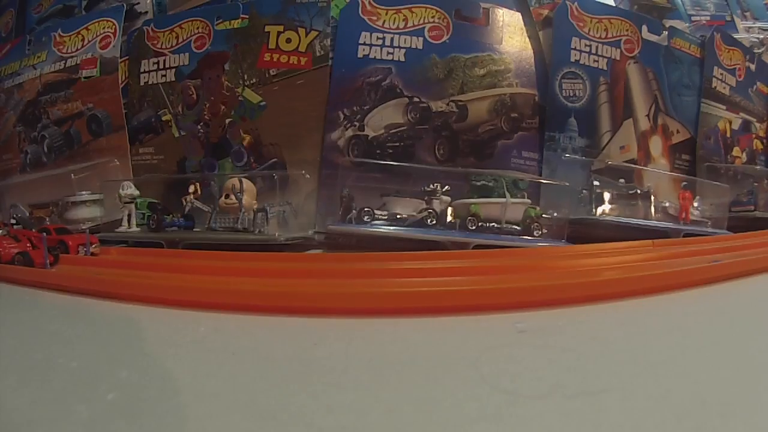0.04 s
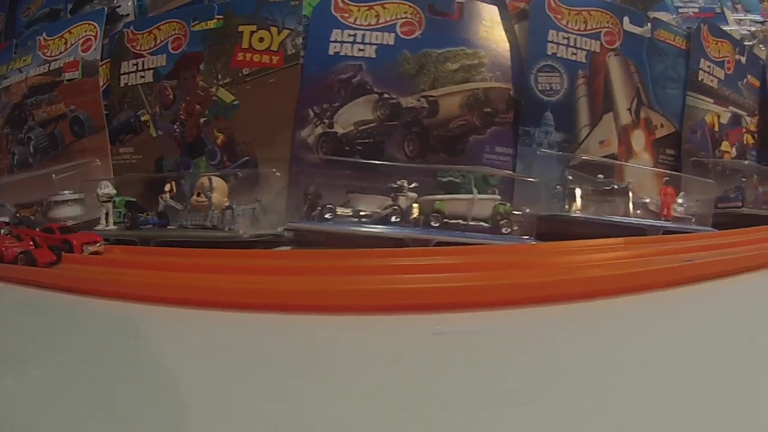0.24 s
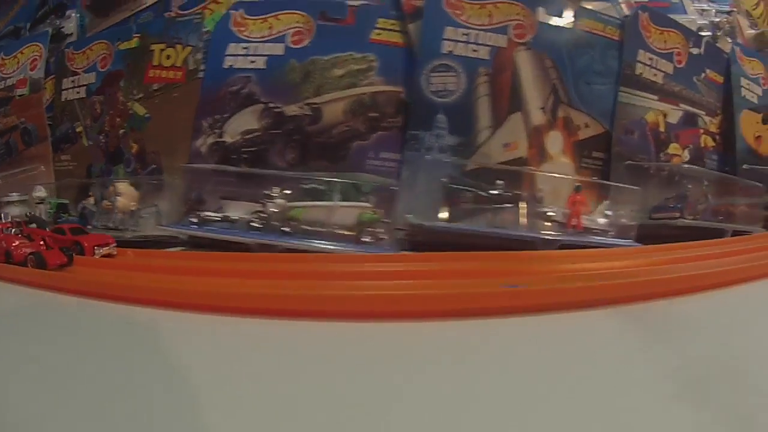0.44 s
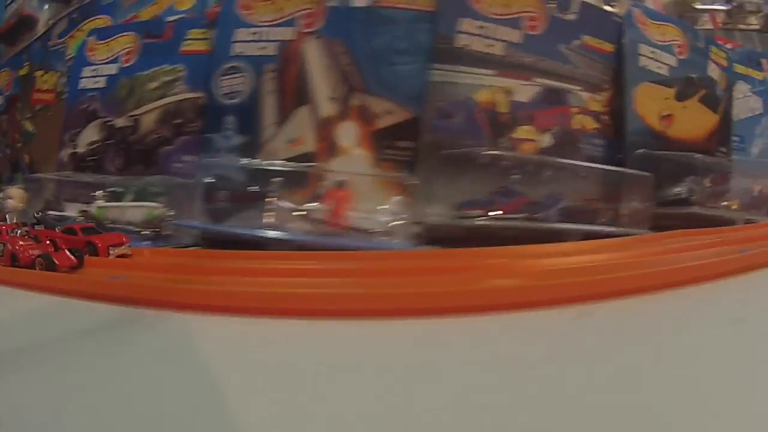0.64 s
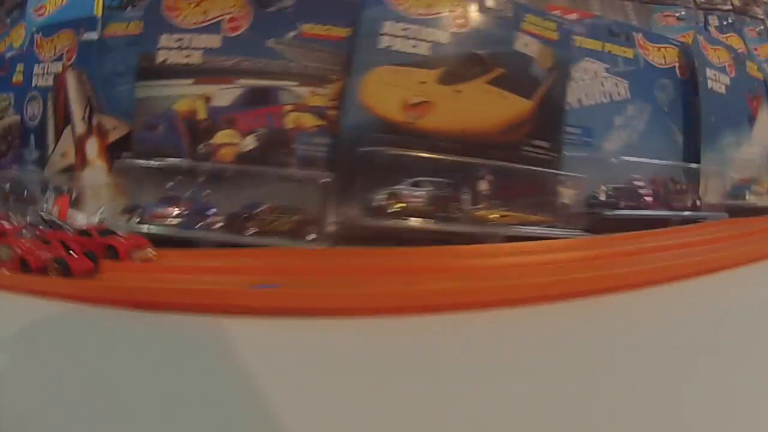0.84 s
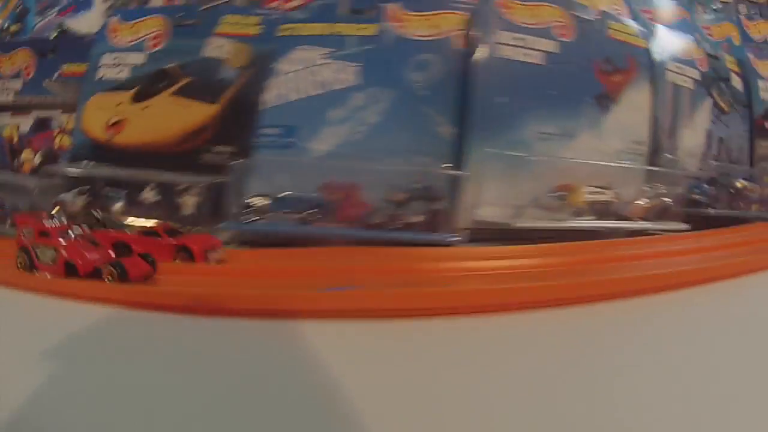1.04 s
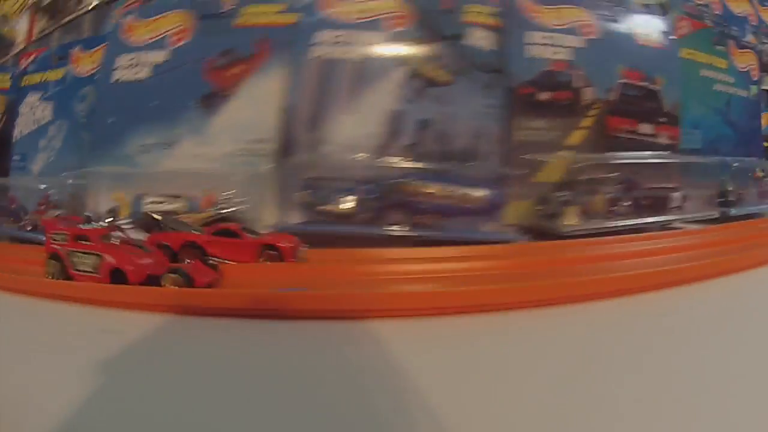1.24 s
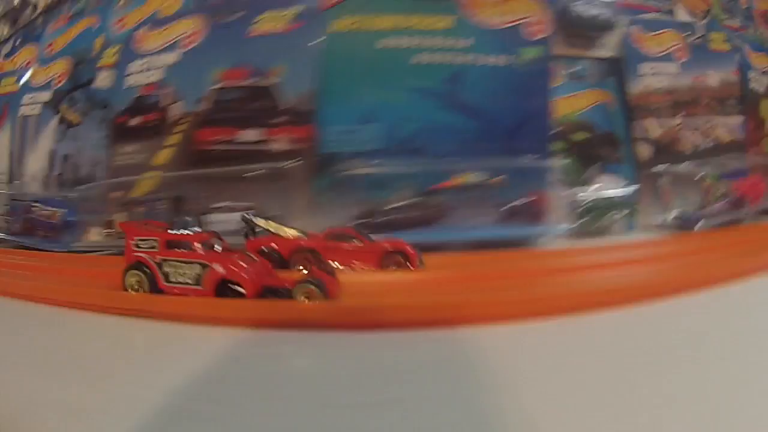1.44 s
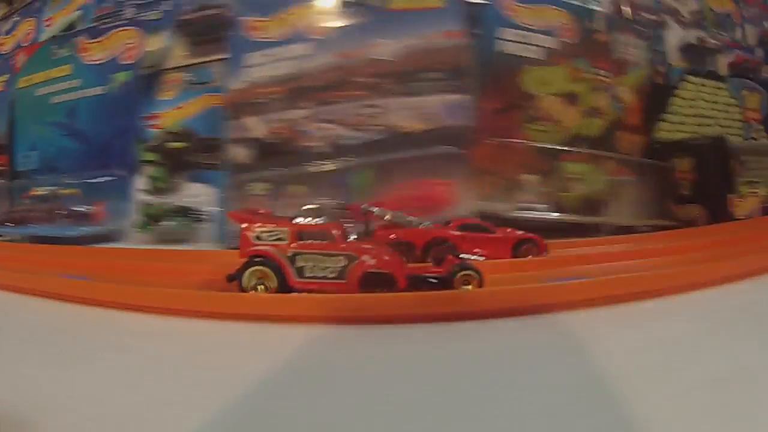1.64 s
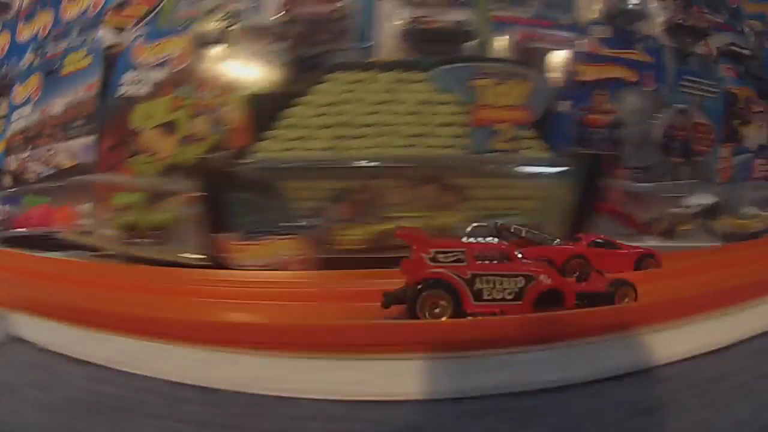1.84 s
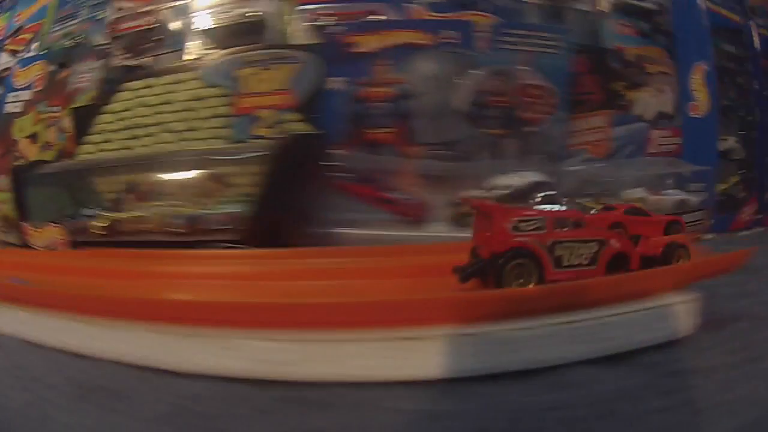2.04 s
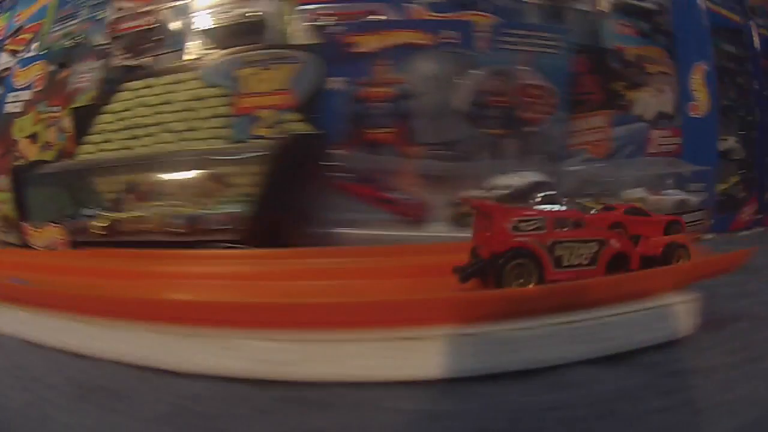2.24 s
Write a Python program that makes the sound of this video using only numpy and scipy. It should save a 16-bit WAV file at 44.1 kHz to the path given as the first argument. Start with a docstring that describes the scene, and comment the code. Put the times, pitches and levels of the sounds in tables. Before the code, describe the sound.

Toy cars roll along a plastic track indoors. After a brief scuff, hard little wheels gather speed, clacking and rattling over a hollow rumble with a few knocks, then the sound stops abruptly. The microphone rides alongside.

```python
"""Toy cars on a plastic track

Indoors, close up, with the microphone riding on a car beside them. A short scuff starts the run.
Hard little wheels roar and clack on the plastic, the carriage rumbles and rocks, and the hollow
under the track drones. Loose axles rattle and bumps in the track knock. The sound stops abruptly."""
import sys
import numpy as np
from scipy import signal
from scipy.fft import rfft, irfft, next_fast_len
from scipy.io import wavfile
from scipy.ndimage import map_coordinates

SR = 44100
rng = np.random.default_rng(int(sys.argv[2]) if len(sys.argv) > 2 else 0)


def generate_wav(sig):
    """Save sig (samples, or channels by samples) to the path in sys.argv[1] as 16-bit PCM at SR."""
    pcm = np.round(np.clip(np.atleast_2d(sig).T, -1, 1) * 32767).astype(np.int16)
    wavfile.write(sys.argv[1], SR, pcm)


N = 101429

# Loudness along the run. Each row: time in seconds, relative level in dB.
ROCKING_LEVELS = [(0.09, -67), (0.132, -26), (0.206, -28.5), (0.234, -25.5), (0.346, -24), (0.576, -20),
                  (0.656, -19), (0.678, -25), (0.918, -18), (0.976, -24.5), (1.292, -27), (1.368, -20),
                  (1.448, -26), (1.506, -17.5), (1.56, -20.5), (1.828, -25.5), (1.86, -36.5), (2.01, -31)]  # slow rocking of the car under the microphone
RUMBLE_LEVELS = [(0.1, -45.5), (0.162, -36), (0.434, -18), (0.85, -29), (0.876, -18.5), (0.95, -34),
                 (0.998, -26), (1.11, -33), (1.578, -22.5), (1.78, -30), (1.812, -24), (1.866, -33),
                 (1.918, -24), (2.01, -36.5)]  # low rumble of its carriage
DRONE_LEVELS = [(0.14, -57), (0.166, -28), (0.196, -44.5), (0.284, -27.5), (0.426, -20), (0.826, -20),
                (0.848, -25.5), (0.916, -21), (0.946, -28), (1.004, -21.5), (1.102, -26.5), (1.18, -23),
                (1.806, -24), (1.9, -31.5), (1.936, -25.5), (2.01, -34)]  # the hollow under the track
ROAR_LEVELS = [(0.27, -39), (0.362, -33), (0.376, -30), (0.576, -21.5), (0.58, -27), (0.84, -21),
               (0.878, -22.5), (0.902, -32.5), (0.908, -23.5), (1.098, -23.5), (1.108, -29.5), (1.162, -22),
               (1.298, -21), (1.312, -26), (1.326, -21), (1.458, -18.5), (1.488, -26.5), (1.526, -19),
               (1.61, -17.5), (1.634, -17.5), (1.654, -24), (1.688, -17.5), (1.794, -19.5), (1.8, -30),
               (1.81, -20.5), (1.82, -30), (1.838, -24.5), (1.96, -22.5), (2.004, -29.5), (2.02, -29.5)]  # wheels on plastic
CHATTER_LEVELS = [(.16, -58), (.31, -59), (.4, -49), (.5, -43.5), (.76, -39.5), (1.1, -35.5), (1.29, -36),
                  (1.51, -29.5), (1.7, -33), (1.79, -30.5), (1.82, -33.5), (1.9, -35.5), (2.02, -40.5)]  # loose axles

# Tone of each source at the microphone. Each row: frequency in Hz, relative level in dB.
ROOM_SPECTRUM = [(25, 5.5), (100, -4), (170, -13), (250, -0.5), (400, -19.5), (1000, -21), (10000, -38.5),
                 (16000, -53.5)]
ROCKING_SPECTRUM = [(10, -30), (25, -11.5), (45, -6.5), (72, -6), (100, -11), (160, -23.5), (400, -69.5)]
RUMBLE_SPECTRUM = [(40, -17.5), (80, -2.5), (120, -2), (160, -2.5), (210, -4.5), (280, -12), (600, -52)]
DRONE_SPECTRUM = [(100, -28.5), (215, -6), (270, 0.5), (320, 1), (365, -1.5), (415, -2), (480, -9),
                  (600, -19), (1000, -32), (2500, -66)]
SCUFF_SPECTRUM = [(300, -9), (1200, -4.5), (2700, 3.5), (4300, -2), (4850, 0), (5150, 14), (5600, 0.5),
                  (6800, 0.5), (8500, -11.5), (14000, -17), (16000, -42.5)]
TRACK_SPECTRUM = [(300, -30), (600, -9.5), (900, -12.5), (1130, -11), (1340, -4), (1750, -1.5), (2200, -3),
                  (2700, -2.5), (3300, 0.5), (4100, -3), (4900, -14), (7000, -14.5), (9000, -22.5),
                  (10000, -26.5), (15000, -30), (16000, -60)]  # the plastic strip, struck by wheels
CHATTER_SPECTRUM = [(1000, -13.5), (4000, -1), (5200, 2.5), (7500, -1), (9000, 0), (9900, -6.5),
                    (13000, -7.5), (14300, -15.5), (15200, -14.5), (16000, -44.5)]
CLICK_SPECTRUM = [(300, -19.5), (1000, -3.5), (2000, -2), (4000, 1.5), (5200, -1), (7500, -3), (9000, -6),
                  (10000, -10), (14000, -21), (16000, -44.5)]
PING_SPECTRUM = [(7000, -29), (10000, -7), (11900, -1.5), (12900, -6), (13900, 6), (15200, -12),
                 (16000, -28)]  # the highest ring of the axles
KNOCK_SPECTRUM = [(200, -9.5), (500, 0), (900, -4.5), (1500, -2), (2200, -6), (4000, -3), (7000, -19.5),
                  (16000, -52)]

# Ringing of the car body. Each row: frequency in Hz, width in Hz, gain in dB.
BODY_MODES = [(6700, 160, -1), (8030, 230, 2), (11830, 520, -1.5), (14200, 400, -9.5)]
# Axles hitting the body. Each row: start in seconds, relative levels of click and ping in dB.
AXLE_CLICKS = [(0.2108, -38, -52), (0.3186, -18.5, -50), (0.327, -21, -53), (0.3576, -16, -27),
               (0.376, -26, -48), (0.4445, -15.5, -35), (0.5666, -16, -24), (0.5714, -8.5, -19),
               (0.5822, -13, -36), (0.604, -11, -29), (0.624, -15, -32), (0.637, -11, -22),
               (0.6519, -15, -29), (0.8671, -6, -22), (0.9163, -15, -26), (0.9298, -12.5, -28.5),
               (0.9714, -21, -30), (1.003, -20, -39), (1.0394, -21, -25), (1.062, -10, -32),
               (1.2201, -15.5, -30), (1.2942, -18, -30), (1.3428, -19.5, -25.5), (1.3552, -15.5, -23),
               (1.4073, -14, -32.5), (1.4566, -10, -22), (1.5154, -18, -26.5), (1.526, -14.5, -26),
               (1.5865, -22, -22), (1.5913, -15, -24), (1.6127, -19, -32), (1.649, -21, -28.5),
               (1.6753, -10.5, -26), (1.6824, -14, -33), (1.6944, -12, -31), (1.7404, -14, -35.5),
               (1.8083, -7.5, -24), (1.8333, -12, -29), (1.8786, -14, -33), (1.9624, -18, -33.5),
               (2.0144, -18.5, -31.5)]
# Bumps in the track. Each row: start in seconds, swing level in dB, pitch in Hz, knock level in dB.
TRACK_BUMPS = [(0.163, -13, 300, -40), (.351, -2, 128, -29), (0.361, -1, 125, -30), (0.441, -1.5, 222, -35),
               (0.5098, -9, 215, -33), (0.5674, -2, 161, -21), (.582, -10, 150, -21), (0.637, -2, 48, -25),
               (0.87, -2.5, 106, -17.5), (0.909, -10, 152, -22), (1.3418, -11, 170, -15),
               (1.491, -13, 48, -28.5), (1.591, -13.5, 200, -17), (1.649, -13, 160, -18),
               (1.808, -5.5, 135, -14.5), (1.833, -12.5, 180, -14.5)]
# Hard wheel strikes. Each row: start in seconds, relative level in dB, pitch in Hz.
WHEEL_CLACKS = [(.1735, -35, 1290), (.2495, -26.5, 3270), (.5085, -8, 3270), (.6045, -11, 3400),
                (.6642, -12, 3180), (.6675, -10, 3700), (.7065, -4, 1860), (0.7472, -4, 1820),
                (.8525, -8, 3070), (.9085, -7.5, 905), (1.171, -8.5, 3030), (1.3425, -5, 3690),
                (1.4333, -3.5, 2510), (1.5605, -4, 3300), (1.6354, -3, 3840), (1.7195, -9, 3540),
                (1.765, -7.5, 1720), (1.7875, -4.5, 4330)]

START_S, SPIN_UP_S, STOP_S = 0.16, 0.43, 2.025  # wheels set off, their time constant, the cut


def amp(db):
    return 10 ** (np.asarray(db) / 20)


def unit(x):
    return x / np.sqrt(np.mean(x ** 2) + 1e-20)


def clock():
    return np.arange(N) / SR


def fade(t, t60):
    """Exponential decay, 60 dB down after t60 seconds."""
    return np.exp(-np.log(1000) * np.maximum(t, 0) / t60)


def level(rows):
    """Gain from (s, dB) points, silent before the first."""
    times, db = np.transpose(rows)
    return amp(np.interp(clock(), times, db, left=-120))


def wobble(per_s):
    """A smooth random curve through per_s knots a second."""
    return map_coordinates(rng.standard_normal(4096), [clock() * per_s], mode='wrap')


def colour(x, spectrum, modes=()):
    """Causal filter of unit power through (Hz, dB) points, with resonances on top."""
    size = 2 * next_fast_len(N)
    freqs = np.fft.rfftfreq(size, 1 / SR)
    hz, db = np.transpose(spectrum)
    gain = amp(np.interp(np.log(freqs + 1), np.log(hz + 1), db))
    gain *= 1 + sum(amp(peak) / (1 + (2 * (freqs - mid) / width) ** 2) for mid, width, peak in modes)
    cepstrum = irfft(np.log(np.maximum(unit(gain), 1e-6)))
    cepstrum[1:size // 2] *= 2  # minimum phase: nothing rings ahead of its strike
    cepstrum[size // 2 + 1:] = 0
    return irfft(rfft(x, size) * np.exp(rfft(cepstrum)))[:N]


def noise(spectrum):
    """Steady coloured noise of unit power."""
    return unit(colour(rng.standard_normal(N), spectrum))


def contacts(per_s, spread_db):
    """Random impulses of log-normal size."""
    size = amp(spread_db * np.clip(rng.standard_normal(N), -2, 2))
    return size * (rng.random(N) < per_s / SR)


def bursts(strikes, t60):
    """Every strike starts a burst of noise, 60 dB down after t60 seconds."""
    power = signal.lfilter([1], [1, -amp(-120 / (t60 * SR))], strikes ** 2)
    return np.sqrt(power) * rng.standard_normal(N)


def carriage():
    """The car under the microphone rocks; small jolts rumble in it and the hollow track drones."""
    jolts = contacts(per_s=970, spread_db=3) * rng.choice([-1, 1], N)
    rumble = level(RUMBLE_LEVELS) * unit(colour(jolts, RUMBLE_SPECTRUM))
    drone = level(DRONE_LEVELS) * noise(DRONE_SPECTRUM)
    rocking = level(ROCKING_LEVELS) * noise(ROCKING_SPECTRUM)
    return amp(-0.5) * (rocking + rumble) + amp(0.5) * drone


def scuff():
    """A brief plastic scuff as the cars set off."""
    start_s, rise_s, length_s = 0.1238, 0.0057, 0.017
    t = clock() - start_s
    shape = np.clip(t / rise_s, 0, 1) * fade(t - length_s, t60=0.057)
    return amp(-31) * shape * noise(SCUFF_SPECTRUM)


def track_rings(per_s=760, low_hz=903, high_hz=4680):
    """Short damped tones at random pitches: the strip answers differently at every spot."""
    draws = rng.random((int(per_s * N / SR), 3))
    when, pitch, size = draws.T[:, :, None]
    age = np.arange(2048)  # samples
    hz = low_hz + (high_hz - low_hz) * pitch
    strength = amp(2.5 * np.minimum(-np.log(size), 3))
    tones = strength * np.sin(2 * np.pi * hz * age / SR) * fade(age / SR, t60=0.03)
    positions = (when * N).astype(int) + age
    return np.bincount(positions.ravel(), tones.ravel(), N)[:N]


def wheels(dull_hz=1510, creep_db=-14):
    """Dense tiny contacts of wheels on plastic, dull and faint until the cars gather speed."""
    grains = contacts(per_s=2600, spread_db=5) * rng.choice([-1, 1], N)
    roar = unit(colour(grains, TRACK_SPECTRUM))
    roar += amp(-2) * unit(colour(track_rings(), TRACK_SPECTRUM))
    roar *= amp(1.26 * wobble(per_s=99))  # uneven wheel load
    speed = 1 - np.exp(-np.maximum(clock() - START_S, 0) / SPIN_UP_S)
    dull = signal.filtfilt(*signal.butter(2, dull_hz, fs=SR), roar)
    first_creep = (START_S, ROAR_LEVELS[0][1] + creep_db)
    loudness = level([first_creep, *ROAR_LEVELS])
    return loudness * unit(speed * roar + 2 * (1 - speed) * dull)


def axles():
    """Loose axles chatter and tick, and now and then click hard against the body."""
    chatter = unit(bursts(contacts(per_s=240, spread_db=5.5), t60=0.024))
    ticks = amp(-5.5) * unit(bursts(contacts(per_s=58, spread_db=4), t60=0.007))
    rattle = level(CHATTER_LEVELS) * colour(chatter + ticks, CHATTER_SPECTRUM, BODY_MODES)
    click_strikes, ping_strikes = np.zeros(N), np.zeros(N)
    for start, click_db, ping_db in AXLE_CLICKS:
        click_strikes[round(start * SR)] = amp(click_db - 4)
        ping_strikes[round(start * SR)] = amp(ping_db + 2.5)
    clicks = colour(bursts(click_strikes, t60=0.014), CLICK_SPECTRUM, BODY_MODES)
    pings = colour(bursts(ping_strikes, t60=0.014), PING_SPECTRUM)
    return amp(-0.5) * rattle + clicks + pings


def bumps(cycles=4, rise_s=0.0006):
    """Each bump is a dry knock that gives the carriage a few heavily damped swings."""
    swings, strikes = np.zeros(N), np.zeros(N)
    for start, swing_db, hz, knock_db in TRACK_BUMPS:
        t = np.maximum(clock() - start, 0)
        shape = (1 - np.exp(-t / rise_s)) * fade(t, t60=cycles / hz)
        swings += amp(swing_db) * shape * np.sin(2 * np.pi * hz * t)
        strikes[round(start * SR)] = amp(knock_db)
    return swings + colour(bursts(strikes, t60=0.025), KNOCK_SPECTRUM)


def clacks():
    """A wheel strikes the track hard: a crack and one short plastic note."""
    notes, strikes = np.zeros(N), np.zeros(N)
    for start, db, hz in WHEEL_CLACKS:
        t = np.maximum(clock() - start, 0)
        notes += 0.5 * amp(db) * np.sin(2 * np.pi * hz * t) * fade(t, t60=0.022)
        strikes[round(start * SR)] = amp(db - 7.5)
    return notes + colour(bursts(strikes, t60=0.012), TRACK_SPECTRUM)


def scene():
    """The run heard in mono from the moving car, over quiet room tone."""
    room = amp(-50.5) * noise(ROOM_SPECTRUM)
    return (wheels() + clacks() + axles() + carriage() + bumps() + scuff() + room)[None]


def record(dry, ceiling=0.9, top_hz=15900, edge_hz=500):
    """Peaks are rounded off, the sound stops dead, and nothing passes above the band limit."""
    rounded = dry / (1 + np.abs(dry / ceiling) ** 6) ** (1 / 6)
    stopped = rounded * fade(clock() - STOP_S, t60=0.0035)
    size = 2 * next_fast_len(N)
    passband = np.clip((top_hz - np.fft.rfftfreq(size, 1 / SR)) / edge_hz, 0, 1)
    return irfft(rfft(stopped, size) * passband, size)[:, :N]


dry = scene()
out = record(dry)
generate_wav(out)
```